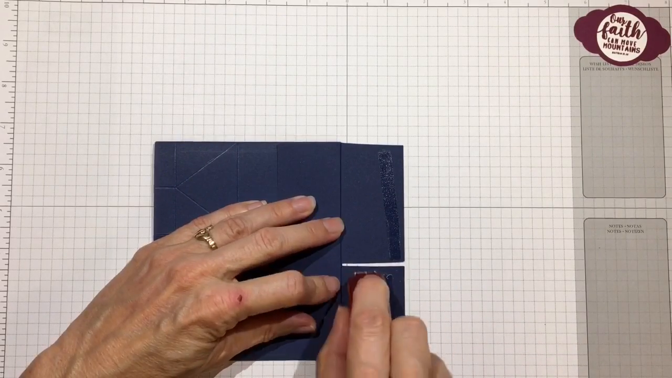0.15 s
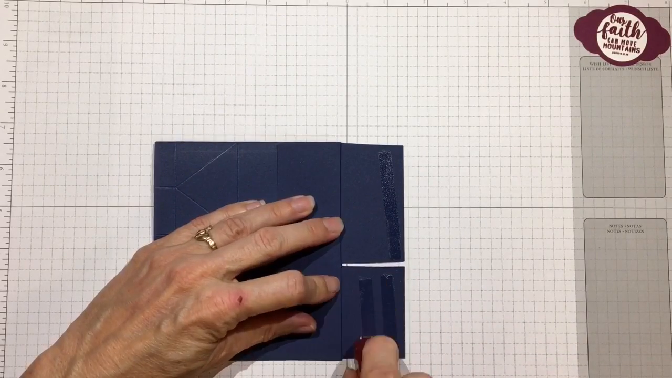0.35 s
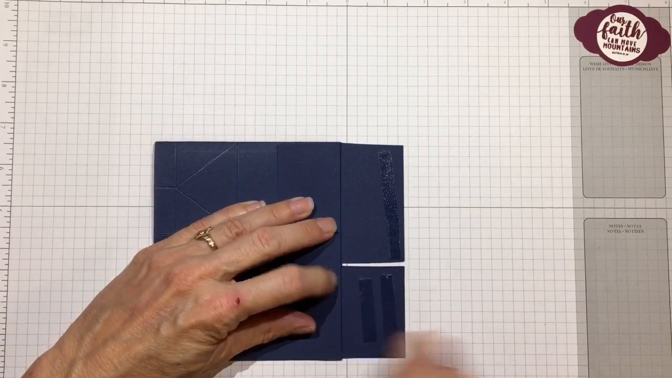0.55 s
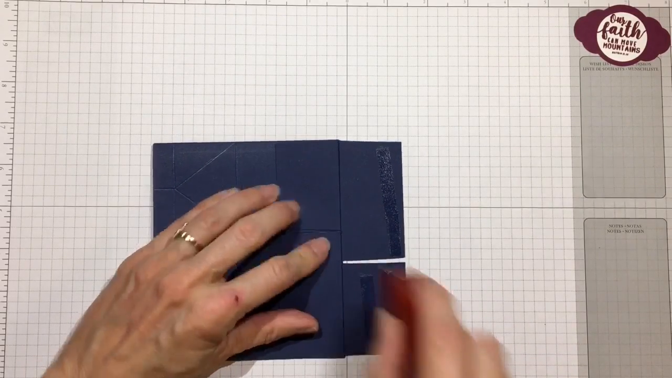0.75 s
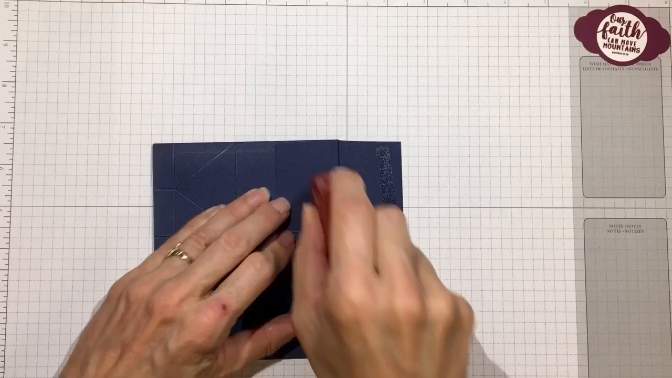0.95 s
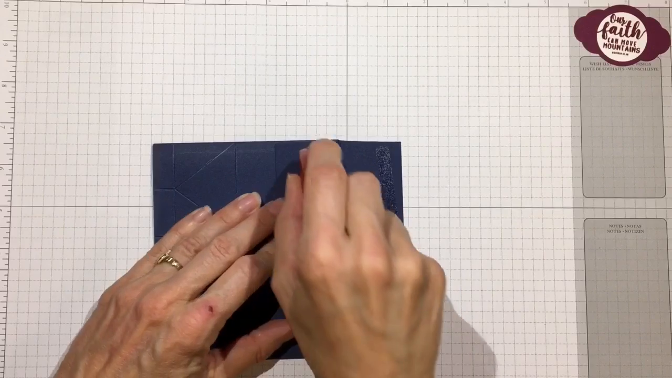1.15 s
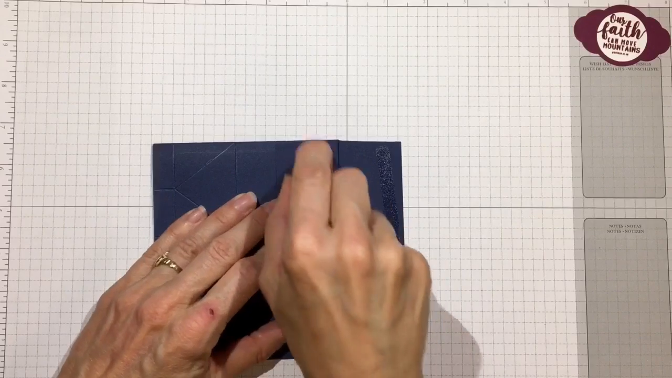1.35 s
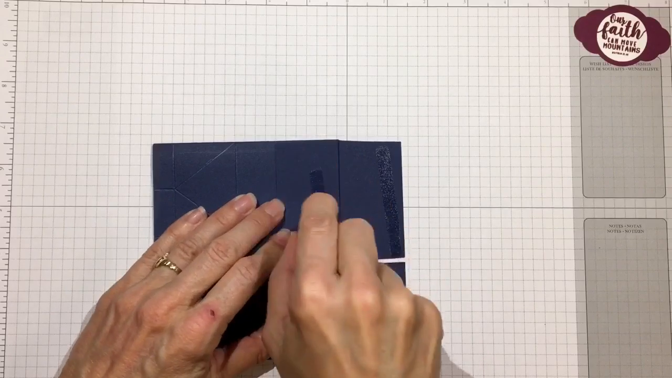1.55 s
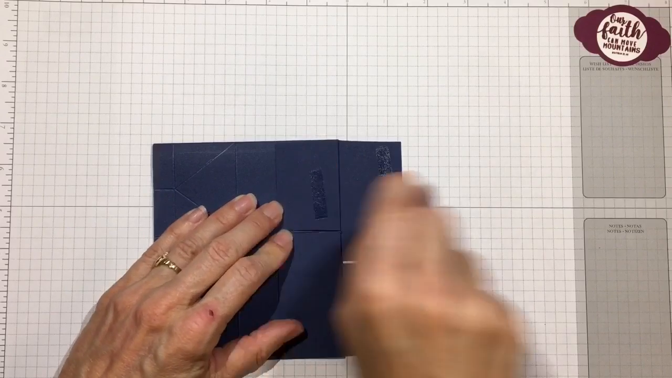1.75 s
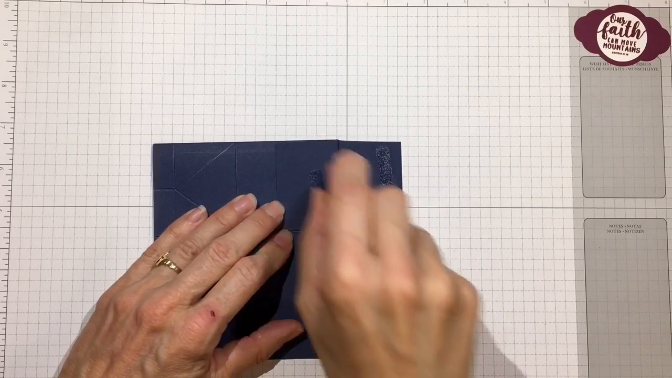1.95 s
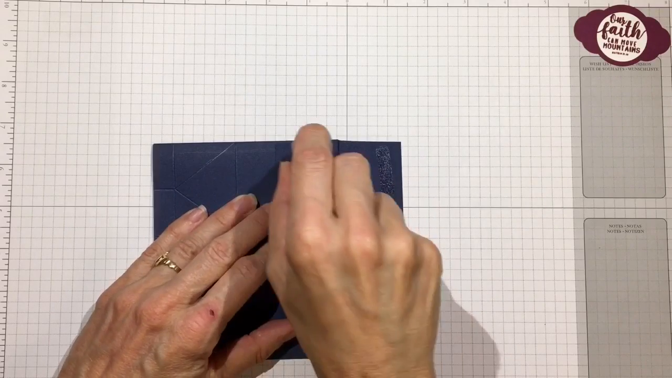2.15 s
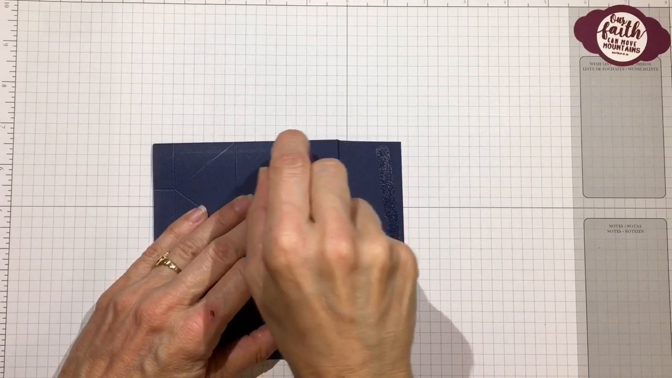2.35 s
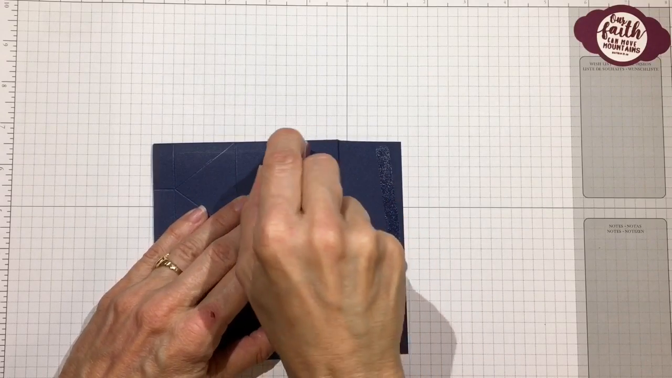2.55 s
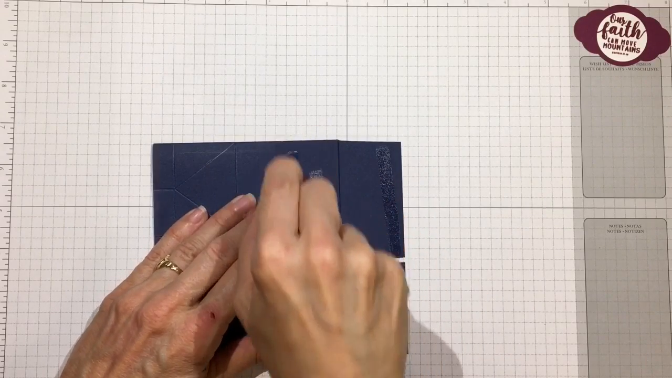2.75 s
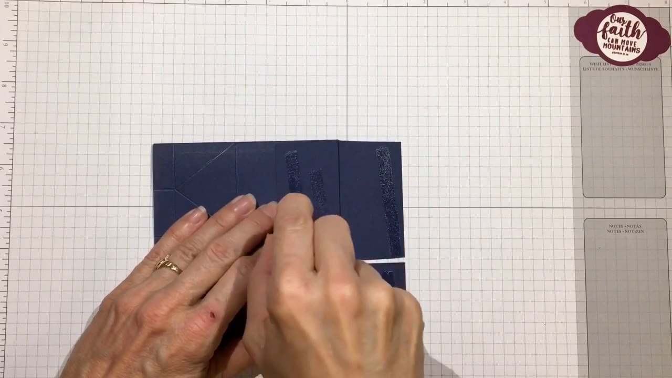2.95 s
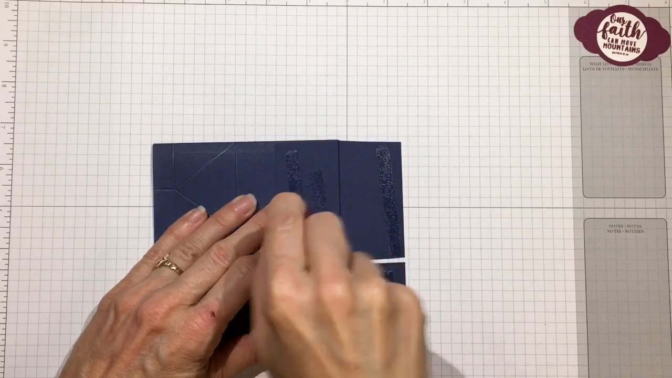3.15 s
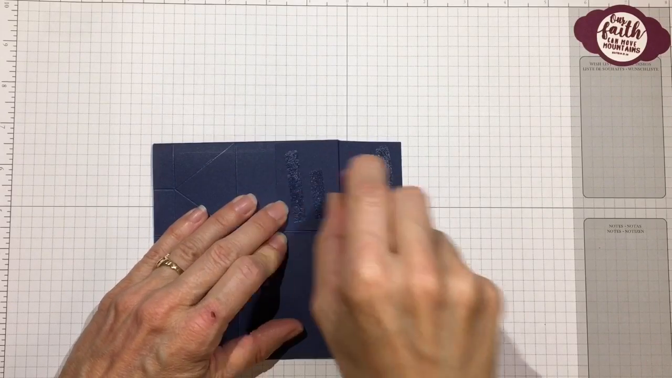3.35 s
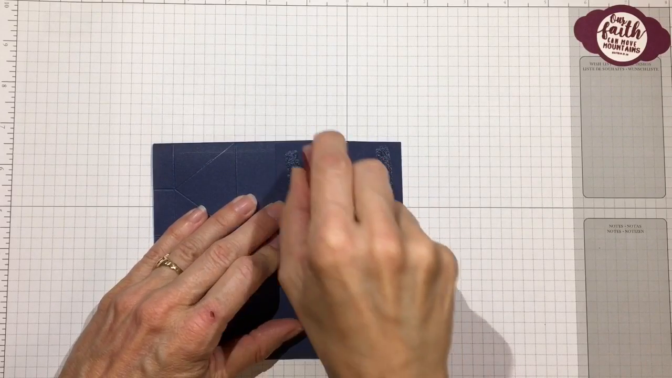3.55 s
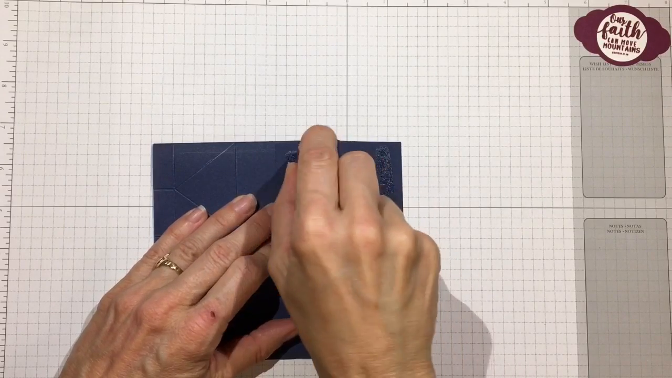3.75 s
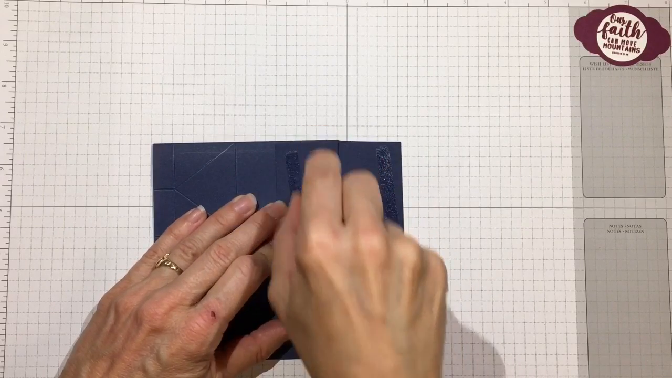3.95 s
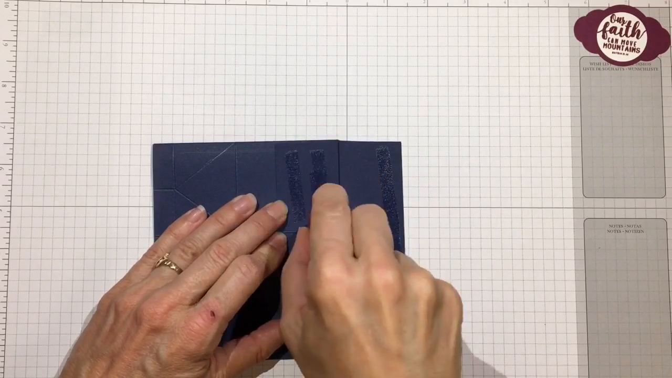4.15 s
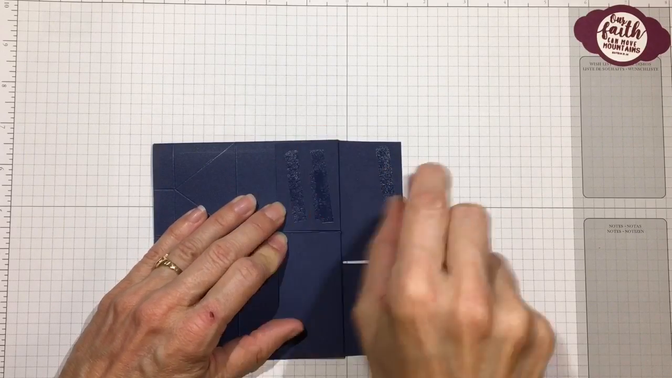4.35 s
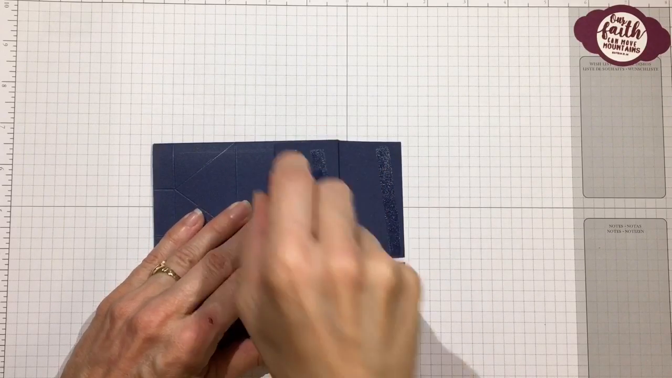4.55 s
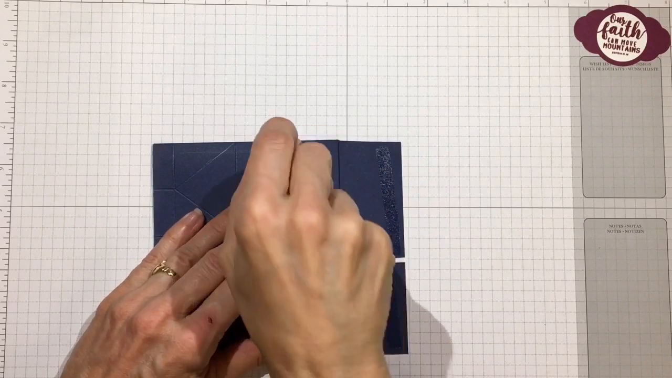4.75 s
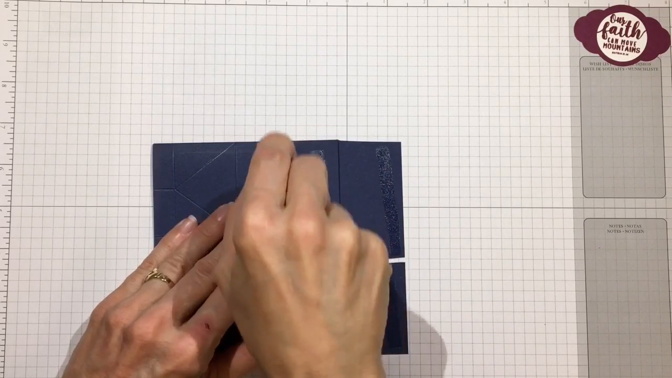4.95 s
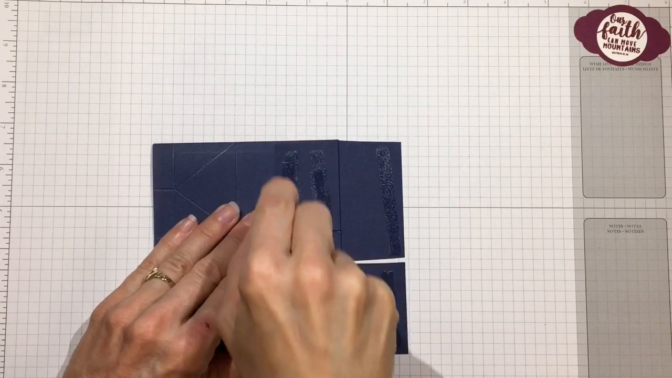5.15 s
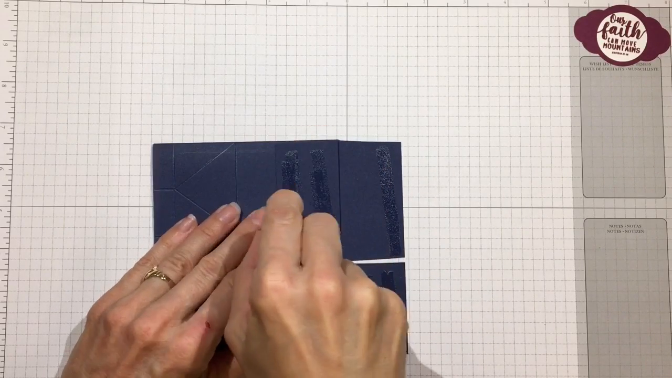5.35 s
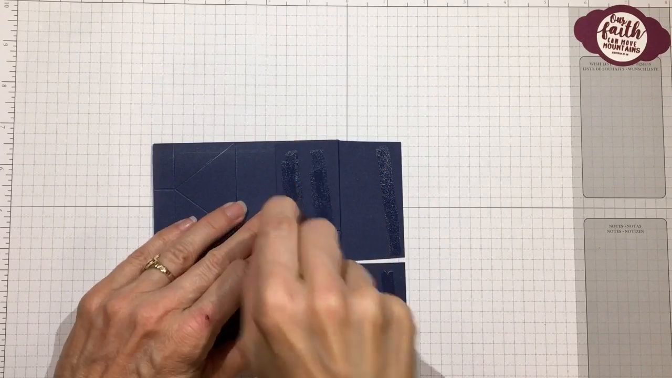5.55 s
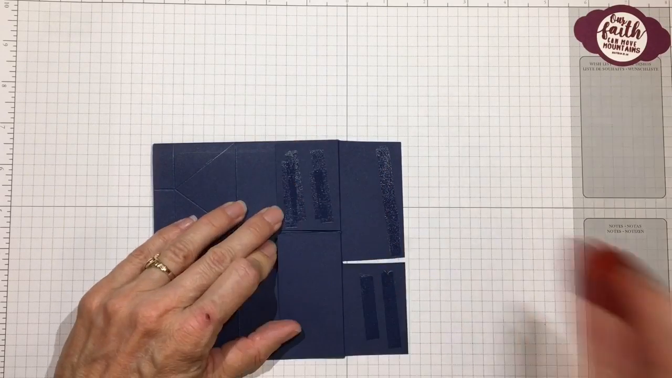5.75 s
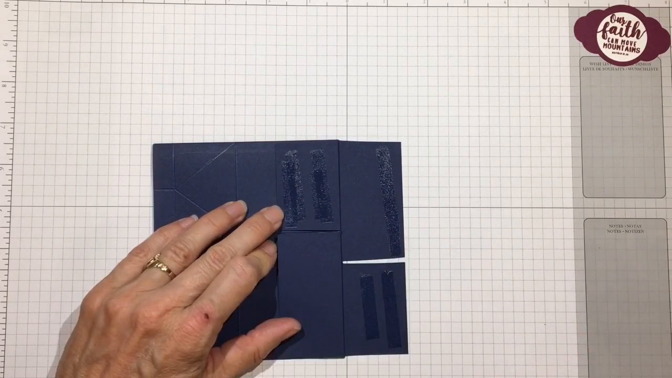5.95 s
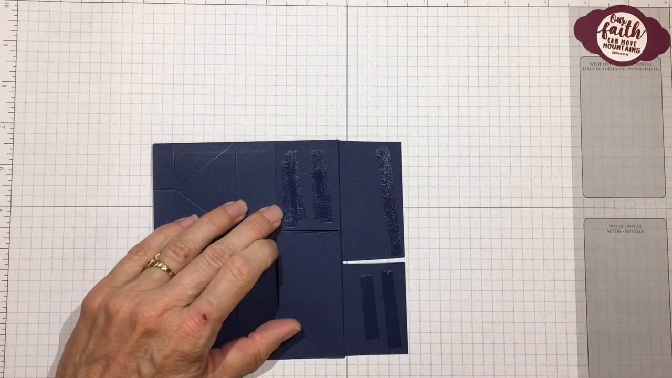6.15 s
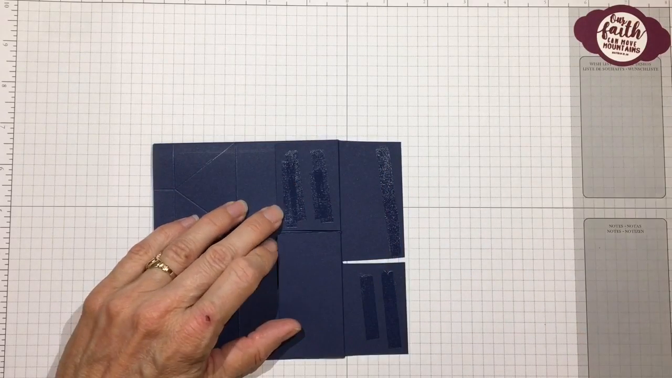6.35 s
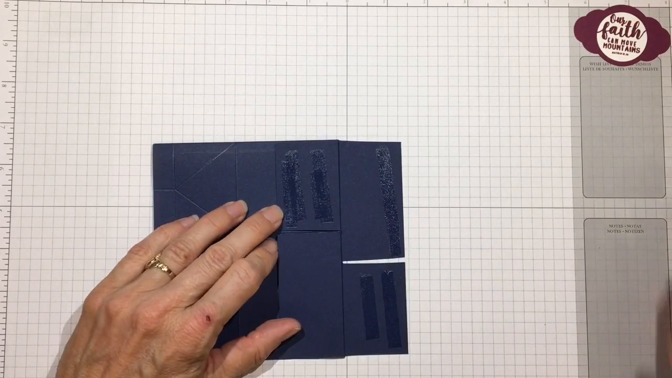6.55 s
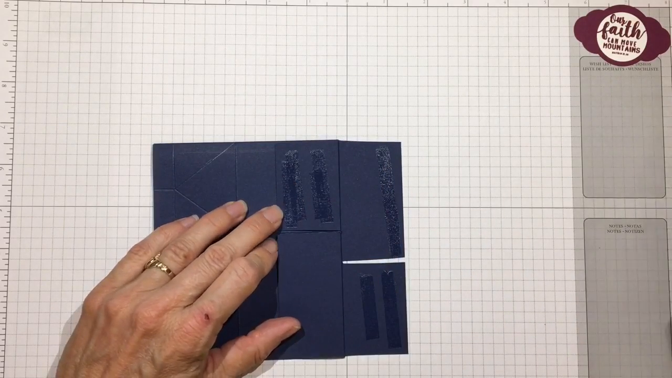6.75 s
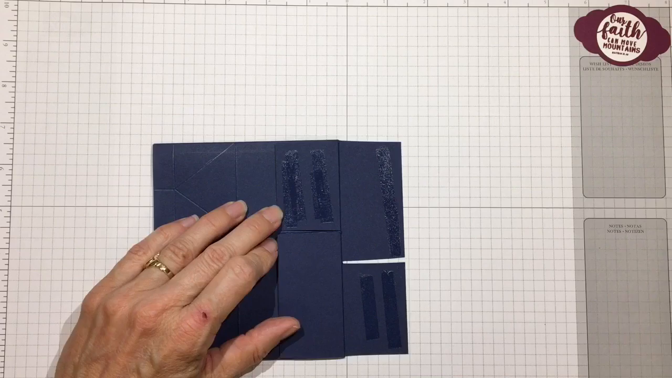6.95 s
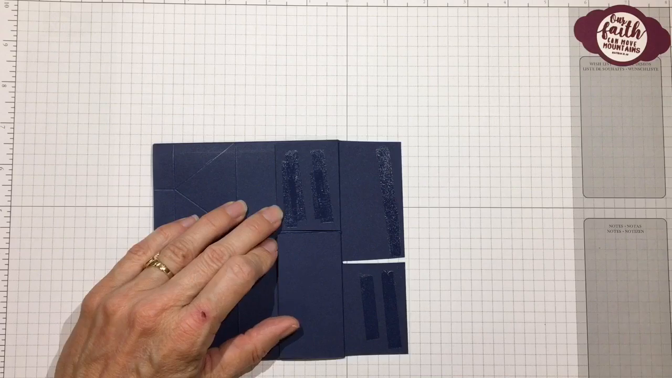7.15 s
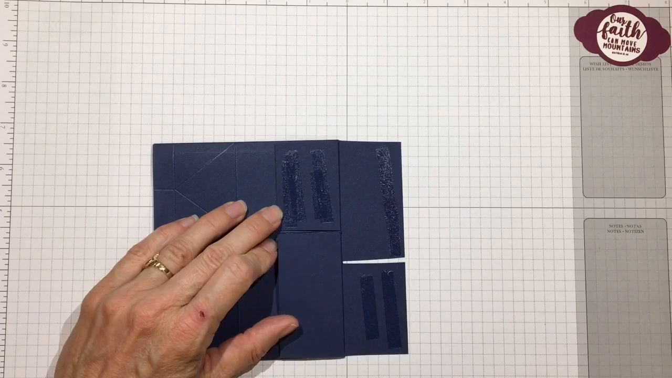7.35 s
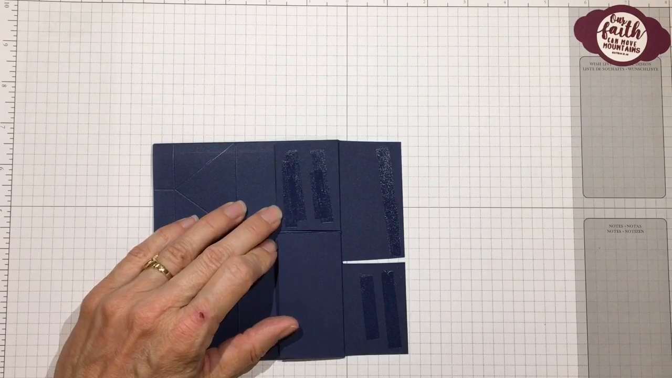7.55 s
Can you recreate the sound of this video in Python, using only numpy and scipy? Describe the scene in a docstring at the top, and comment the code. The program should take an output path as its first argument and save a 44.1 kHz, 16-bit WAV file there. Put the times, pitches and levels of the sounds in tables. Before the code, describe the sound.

A plastic tape runner works on card close to the microphone, in a small room with a faint low hum and air noise. A short, hollow rasp comes at about 0.3 seconds, followed by sharp plastic clicks at 0.6 and a few table taps and card scuffs up to 1.2. More pulls follow near 1.5, 2.8 and 4 seconds, each with a fine crackle of peeling tape and a slight table rumble. The casing clicks as it lifts, around 1.8, 3.2 and 4.3 seconds. A softer fifth stroke runs around 5 seconds among small ticks, ending with a clear click at 5.7. A brief squeaky scuff of card comes at 5.9, then light taps and faint finger rubbing until about 7. A loud, quick double knock on the table comes at about 7.6 seconds.

```python
"""Tape runner on card.

A plastic runner is pressed down, drawn in short strokes and lifted, close to the microphone.
Slips and clicks ring its hollow shell; tape crackles off its backing. Card slides, things tap
the table, the hand's weight makes it rumble. Small room, wavering hum, faint air noise."""
import sys
import numpy as np
from scipy import signal
from scipy.fft import irfft
from scipy.io import wavfile
from scipy.ndimage import uniform_filter1d

SR = 44100
rng = np.random.default_rng(int(sys.argv[2]) if len(sys.argv) > 2 else 0)


def persist_wave(psi):
    """Save psi, clipped to +-1, as 16-bit WAV."""
    counts = np.round(np.clip(psi, -1, 1) * 32767).astype(np.int16)
    wavfile.write(sys.argv[1], SR, np.atleast_2d(counts).T)


N = 339570

# runner strokes: down_s, pull_start_s, full_speed_s, slowing_s, pull_end_s, wrench_s, lift_s,
# rest_db, drag_db, peel_db, wrench_db, lean_db
STROKES = [(0.115, 0.281, 0.32, 0.368, 0.43, 0.47, 0.86, -68, -41, -61.5, -64, -48),
           (1.216, 1.45, 1.497, 1.474, 1.59, 1.66, 1.77, -68, -40, -50.5, -51.5, -41),
           (2.486, 2.73, 2.78, 2.75, 3.054, 3.2, 3.05, -69, -49.5, -58.5, -60, -50),
           (3.821, 3.935, 3.975, 4.08, 4.15, 4.23, 4.31, -65, -49, -59.5, -56, -51),
           (4.838, 4.936, 5.04, 5.26, 5.27, 7.6, 6.8, -65, -59, -66, -54, -59.5)]
# shell clicks: time_s, wall_db, hollow_db, snap_db
CLICKS = [(0.136, -55.5, -42.5, -58), (0.2607, -48.5, -42, -44.5), (0.4698, -55, -44, -62),
          (0.5516, -59.5, -56, -57), (0.586, -47, -65, -62), (0.5915, -28, -26, -36.5),
          (0.6127, -31, -29, -35), (0.6459, -45, -69, -54), (1.2466, -54, -43.5, -53.5),
          (1.2724, -39.5, -53, -47), (1.2849, -47.5, -44, -54), (1.345, -51, -44.5, -45.5),
          (1.3782, -52.5, -47, -48.5), (1.4167, -57, -44, -53.5), (1.4651, -61, -43, -47),
          (1.5663, -60, -69, -47.5), (1.719, -44.5, -27.5, -72), (1.7389, -39, -33, -52),
          (1.7673, -55, -43, -32), (1.774, -28, -28.5, -27.5), (2.4915, -55.5, -54, -53.5),
          (2.6296, -65, -39, -49.5), (2.6499, -53, -39.5, -74), (2.6825, -49.5, -32, -47.5),
          (2.9411, -44.5, -64, -51), (2.9512, -59, -41, -36), (2.978, -68, -62, -48.5),
          (3.0384, -44, -44.5, -47.5), (3.175, -55.5, -65, -60), (3.2092, -47, -36, -58),
          (3.2315, -36, -41, -29.5), (3.256, -39.5, -29.5, -39), (3.704, -52.5, -35, -49.5),
          (3.918, -52, -55, -75), (3.973, -63, -59, -48), (3.988, -44, -49, -52), (4.259, -48, -38, -58),
          (4.2732, -44, -34.5, -38.5), (4.286, -45, -64, -53), (4.3121, -31, -25, -31),
          (4.33, -40.5, -54, -45), (4.8324, -57.5, -59, -53), (4.9538, -57, -49, -45),
          (4.988, -70, -70, -59), (5.0091, -56, -51, -44.5), (5.024, -46.5, -46, -41),
          (5.05, -54, -37.5, -51), (5.182, -68, -62, -46.5), (5.315, -45.5, -58, -53),
          (5.3535, -45, -71, -43), (5.4626, -61, -53, -57), (5.5019, -50, -43, -63),
          (5.5633, -47, -42.5, -44.5), (5.6276, -35.5, -41, -39), (5.6621, -30.5, -29, -35.5),
          (5.777, -56, -56, -49)]
# table taps: time_s, top_db, thud_db, snap_db, pitch_ratio
TAPS = [(0.023, -44, -40.5, -47, 0.9), (0.759, -40.5, -35, -36.5, 0.95), (0.879, -33, -76, -50.5, 1.045),
        (0.926, -42.5, -65, -69, 1.02), (0.999, -32.5, -71, -56, 1.05), (5.398, -70, -40, -81, 1.16),
        (6.036, -56, -73, -80, 1.56), (6.141, -54.5, -54, -64, 1.107), (6.176, -57.5, -72, -80, 2.126),
        (6.242, -53, -45.5, -63, 1.2), (6.279, -50.5, -54, -58, 0.87), (6.352, -57.5, -47.5, -75, 0.72),
        (6.434, -52, -54, -84, 1.45), (6.51, -59, -37.5, -65.5, 1.03), (7.3, -85, -85, -62, 3.006),
        (7.356, -83, -85, -63, 3.105), (7.392, -53, -43, -57, 2.55), (7.442, -83, -83, -59, 1.7),
        (7.497, -60, -50, -88, 0.93), (7.558, -28.5, -17.5, -36.5, 0.97), (7.581, -32, -33, -40.5, 1.1)]
# card and finger scuffs, plus one brief high crackle of peeling tape near 4.94 s: start_s, peak_s, end_s,
# level_db, centre_hz, crackle_share
SCUFFS = [(0.61, 0.758, 0.74, -62, 4450, 0.02), (0.753, 0.8, 0.97, -55, 5500, 0.48),
          (0.757, 0.887, 1.19, -58.5, 1170, 0.3), (0.98, 1.037, 1.155, -56, 4500, 0.48),
          (3.626, 3.66, 3.83, -66, 1180, 0.1), (4.397, 4.46, 4.62, -65, 2280, 0.32),
          (4.805, 4.807, 5.2, -68, 890, 0.9), (4.937, 4.987, 5.04, -66, 12900, 0.8),
          (5.856, 5.881, 5.908, -44, 1800, 0.25), (5.972, 5.982, 5.995, -60, 2160, .4),
          (6.128, 6.151, 6.17, -62.5, 2320, 0.92), (6.34, 6.364, 6.47, -65.5, 1000, 0.88),
          (6.047, 6.246, 6.443, -66.5, 800.6, 0.5), (6.587, 6.85, 7.05, -78.5, 1105, 0.61)]
# hand bumps on the table: centre_s, length_s, level_db
BUMPS = [(0.033, 0.072, -54.5), (0.148, 0.031, -55), (2.685, 0.12, -48.5), (6.294, 0.037, -51),
         (7.582, 0.098, -52)]
# modes: pitch_hz, width_hz, gain_db
HOLLOW_MODES = [(582, 95, 0), (645, 120, -2)]  # air in the shell
WALL_MODES = [(1043, 48, -3), (1184, 114, -3.5), (1586, 270, -4.5), (2040, 59, -5), (2200, 195, 6),
              (3240, 240, -3), (6100, 150, -12.5)]  # shell walls
TOP_MODES = [(1064, 73, 3.5), (1490, 660, 5), (1980, 550, 2.5), (2570, 280, -3.5), (3300, 240, -4.5),
             (3800, 500, -6)]  # table top
THUD_MODES = [(326, 190, -8), (610, 164, -2)]  # table body
LEAN_MODES = [(102.7, 22, -3), (260, 45, -9)]  # table under the hand
# spectra: freq_hz, gain_db
PEEL_SPECTRUM = [(500, 5.5), (1500, 1), (3000, -1), (6000, -2.5), (9500, -4.5), (13000, -11.5),
                 (16000, -17)]  # peeling tape
SNAP_SPECTRUM = [(1500, -21), (3500, 7), (6000, 4), (9000, 2), (13000, -3.5), (16000, -16)]  # contact snap
AIR_SPECTRUM = [(15, -23), (25, 0.5), (48, -10), (70, -3), (135, -12), (187, -20), (238, -19), (510, -29.5),
                (1030, -31), (4990, -41), (12200, -44), (14800, -48.5), (16500, -66)]  # room noise
# hum levels: time_s, low_db, octave_db
HUM_LEVELS = [(0.0, -56, -61.5), (0.39, -59.5, -64), (0.96, -54, -63.5), (7.06, -55.5, -65.5),
              (7.7, -60.5, -62)]
# room decay: freq_hz, t60_s
ROOM_DECAY = [(500, 0.19), (4000, 0.17), (12000, 0.17)]

PULL_ENDS_DB, PEEL_ENDS_DB, PULL_EXPONENT = -23, -21.5, 1.15  # ends relative to full speed
SETTLE_S, LINGER_S, RELEASE_S = 0.03, 0.076, 0.065
REST_PEEL_DB, REST_HOLLOW_DB, WRENCH_PEEL_DB = -11.5, 0.5, -9
GRIP_DETUNE, GRIP_DB, CHATTER_RISE_S = 0.02, 2, 0.00019
SQUEAK_UNDER_S, SQUEAK_DB = 0.06, 9
HUM_HZ, PAIR_HZ, UPPER_HZ, UPPER_DB = 58.9, (117.8, 122.06), 246, -77.5
AIR_DB, BAND_LIMIT_HZ = -60, 16100


def strokes():
    """The roller drags: slips ring the shell, tape peels off its backing."""
    drag, peel, _, light_rub = hand_gains()
    slips = grit(per_s=600, spread_db=3.5, smooth=0.6, lumps_db=3, grain_s=0.0004)
    hollow = ring((drag + light_rub) * slips, HOLLOW_MODES, -0.85)
    walls = highpass(ring(drag * slips, WALL_MODES), 620)
    crackle = grit(per_s=600, spread_db=4, smooth=0.8, lumps_db=2.5, grain_s=0.0005)
    return amp(-6.5) * hollow + amp(-3) * walls + amp(2.5) * peel * colour(crackle, PEEL_SPECTRUM)


def hand_gains():
    """Stroke envelopes: resting rub, swelling pull, and a wrench if it starts before the lift."""
    t = np.arange(N) / SR
    drag, peel, lean, light_rub = np.zeros((4, N))
    for down_s, start_s, full_s, slowing_s, end_s, wrench_s, lift_s, *levels_db in STROKES:
        rest_db, drag_db, peel_db, wrench_db, lean_db = levels_db
        rest = np.interp(t, [down_s, down_s + SETTLE_S, end_s, end_s + LINGER_S], [0, 1, 1, 0])
        rest *= amp(rest_db)
        wrench = amp(wrench_db) * np.interp(t, [wrench_s, lift_s, lift_s + RELEASE_S], [0, 1, 0])
        early = (full_s - t) / (full_s - start_s)
        late = (t - slowing_s) / (end_s - slowing_s)
        slack = np.maximum(np.maximum(early, late), 0) ** PULL_EXPONENT  # 0 at full speed
        drag += rest + wrench + amp(drag_db + PULL_ENDS_DB * slack)
        peel += amp(REST_PEEL_DB) * rest + amp(WRENCH_PEEL_DB) * wrench
        peel += amp(peel_db + PEEL_ENDS_DB * slack)
        lean += amp(lean_db + PULL_ENDS_DB * slack)
        light_rub += amp(REST_HOLLOW_DB) * rest
    return drag, peel, lean, light_rub


def clicks():
    """Each click rings the shell's walls and hollow and snaps in the treble."""
    walls = blows(CLICKS, 1, 0.0042, 0.25, lambda x, row, grip: ring(x, gripped(WALL_MODES, grip)))
    hollow = blows(CLICKS, 2, 0.0026, 0.37,
                   lambda x, row, grip: ring(x, gripped(HOLLOW_MODES, grip), -1.53))
    snap = blows(CLICKS, 3, 0.0026, 0.43, lambda x, *_: colour(x, SNAP_SPECTRUM))
    return amp(22.5) * highpass(walls, 620) + amp(17) * hollow + amp(17.5) * snap


def gripped(modes, grip):
    """The shifting grip detunes and reweights the modes."""
    return [(hz * (1 + GRIP_DETUNE * detune), width_hz, db + GRIP_DB * weight)
            for (hz, width_hz, db), detune, weight in zip(modes, *grip)]


def taps():
    """Table taps: brief ring, low thud, bright snap. Small things ring higher."""
    top = blows(TAPS, 1, 0.0035, 0.38, lambda x, row, _: ring(x, pitched(TOP_MODES, row[4])))
    thud = blows(TAPS, 2, 0.0082, 0.34, lambda x, row, _: ring(x, pitched(THUD_MODES, row[4])))
    snap = blows(TAPS, 3, 0.0012, 0.95, lambda x, row, _: colour(x, pitched(SNAP_SPECTRUM, row[4])))
    return amp(25) * highpass(top, 890) + amp(13) * thud + amp(24.5) * snap


def scuffs():
    """Card and fingers slide, and tape briefly crackles high up: swells of rub and crackle in a broad band.
    Brief ones squeak."""
    out, rub = np.zeros(N), rng.standard_normal(N)
    crackle = grit(per_s=200, spread_db=3, smooth=0.4, lumps_db=2, grain_s=0.0015)
    for start_s, peak_s, end_s, level_db, hz, share in SCUFFS:
        span = np.arange(round(start_s * SR), round(end_s * SR))
        ramp = np.interp(span / SR, [start_s, peak_s, end_s], [0, 1, 0])
        swell = np.sin(np.pi / 2 * ramp) ** 1.5
        centre_db = SQUEAK_DB * (end_s - start_s < SQUEAK_UNDER_S)
        band = [(hz / 8, -30), (hz / 1.5, -10), (hz / 1.15, -3),
                (hz, centre_db), (hz * 1.15, -2), (hz * 6, -25)]
        friction = (1 - share) * rub[span] + share * crackle[span]
        out[span] += amp(level_db) * swell * colour(friction, band)
    return out


def table_rumble():
    """Uneven hand weight stirs the table's low modes."""
    t = np.arange(N) / SR
    _, _, lean, _ = hand_gains()
    bumps = sum(amp(db) * np.cos(np.pi * np.clip((t - centre_s) / length_s, -0.5, 0.5))
                for centre_s, length_s, db in BUMPS)
    return highpass(ring((lean + bumps) * rng.standard_normal(N), LEAN_MODES), 51)


def room(x):
    """Sparse echoes of random sign, each band dying at its own rate."""
    echoes = np.zeros(SR // 2)
    slots = np.arange(150, SR // 2 - 20, 20)
    echoes[slots + rng.integers(0, 20, len(slots))] = rng.choice([-1., 1.], len(slots))
    hz, t, spectra = signal.stft(echoes, SR, nperseg=256)
    decay = amp(-60 * t / log_interp(ROOM_DECAY, hz)[:, None])
    tail = signal.istft(spectra * decay, SR, nperseg=256)[1]
    return signal.oaconvolve(x, tail / np.linalg.norm(tail))[:N]


def hum():
    """Low tone, beating pair near its octave, faint upper tone; all waver."""
    t = np.arange(N) / SR
    times_s, low_db, octave_db = np.transpose(HUM_LEVELS)
    low, octave = amp(np.interp(t, times_s, low_db)), amp(np.interp(t, times_s, octave_db))
    tones = [(HUM_HZ, low, 0.5), (PAIR_HZ[0], octave, 0.5), (PAIR_HZ[1], 0.49 * octave, 0.5),
             (UPPER_HZ, amp(UPPER_DB), 0.9)]
    return sum(np.sqrt(2) * rms * np.sin(2 * np.pi * hz * t + waver_rad * drift(per_s=8.9))
               for hz, rms, waver_rad in tones)


def air():
    """Steady room noise, strongest in the bass."""
    frames, hz = N // 512 + 5, np.fft.rfftfreq(2048, 1 / SR)
    real, imag = rng.standard_normal((frames, 1025, 2)).T
    spectra = (real + 1j * imag) * amp(log_interp(AIR_SPECTRUM, hz))[:, None]
    return amp(AIR_DB) * unit_rms(signal.istft(spectra, nperseg=2048, noverlap=1536)[1][:N])


def grit(per_s, spread_db, smooth, lumps_db, grain_s):
    """Stick-slip: uneven rasping grains over a smooth rub, in lumps."""
    jolts = amp(spread_db * np.minimum(rng.exponential(1, N), 5)) * (rng.random(N) < per_s / SR)
    grains = signal.lfilter([1], [1, -np.exp(-1 / (grain_s * SR))], jolts) * rng.standard_normal(N)
    friction = unit_rms(grains) + smooth * rng.standard_normal(N)
    return unit_rms(friction * amp(lumps_db * drift(per_s=67)))


def blows(rows, db_column, chatter_s, chatter_gain, body):
    """One impulse plus chatter per row, sounded through body(force, row, random_grip)."""
    out, lead = np.zeros(N + 6000), 256
    t = np.arange(-lead, 1000) / SR
    envelope = chatter_gain * np.exp(-abs(t) / chatter_s) * np.clip(t / CHATTER_RISE_S, 0, 1)
    forces = envelope * rng.standard_normal((len(rows), len(t)))
    forces[:, lead] = 1  # first contact
    for row, force, grip in zip(rows, forces, rng.standard_normal((len(rows), 2, 10))):
        sound = body(force / np.linalg.norm(force), row, grip)
        at = round(row[0] * SR) - lead
        out[at:at + len(sound)] += amp(row[db_column]) * sound
    return out[:N]


def ring(force, modes, mode_ratio=1):
    """Damped modes, unit energy. Mode k is weighted mode_ratio ** k; negative opposes neighbours."""
    t = np.arange(4000) / SR
    response = np.zeros(len(t))
    for k, (hz, width_hz, db) in enumerate(modes):
        gain = mode_ratio ** k * amp(db) * np.sqrt(width_hz)
        response += gain * np.exp(-np.pi * width_hz * t) * np.sin(2 * np.pi * hz * t)
    return signal.oaconvolve(force, response / np.linalg.norm(response))[:N]


def colour(x, spectrum):
    """Spectral shaping that keeps the power of white noise."""
    gain = amp(log_interp(spectrum, np.fft.rfftfreq(512, 1 / SR)))
    kernel = np.roll(irfft(gain), 256) * np.hanning(512)
    return signal.oaconvolve(x, kernel / np.linalg.norm(kernel), "same")


def drift(per_s):
    """Smooth noise, rms 1, about per_s changes a second."""
    size = max(int(SR / per_s), 2)
    return unit_rms(uniform_filter1d(uniform_filter1d(rng.standard_normal(N), size), size))


def pitched(table, ratio):
    return [(hz * ratio, *rest) for hz, *rest in table]


def highpass(x, hz):
    return signal.sosfilt(signal.butter(2, hz, "highpass", fs=SR, output="sos"), x)


def log_interp(points, hz):
    points_hz, values = np.transpose(points)
    return np.interp(np.log(hz + 1), np.log(points_hz + 1), values)


def unit_rms(x):
    return x / np.sqrt(np.mean(x ** 2) + 1e-30)


def amp(db):
    return 10 ** (np.asarray(db) / 20)


def scene():
    """Close sources, their room echo, hum and air; mono."""
    near = strokes() + table_rumble() + scuffs() + clicks() + taps()
    return (near + amp(-7.5) * room(near) + hum() + air())[None]


def record(dry):
    """Microphone: deep bass cut, narrow treble dip, band limit."""
    heard = highpass(dry, 36)
    heard = heard - 0.29 * signal.lfilter(*signal.iirpeak(10600, Q=9, fs=SR), heard)
    lowpass = signal.firwin(511, BAND_LIMIT_HZ, window=("kaiser", 9), fs=SR)
    return signal.oaconvolve(heard, lowpass[None], "same")


dry = scene()
out = record(dry)
persist_wave(out)
```